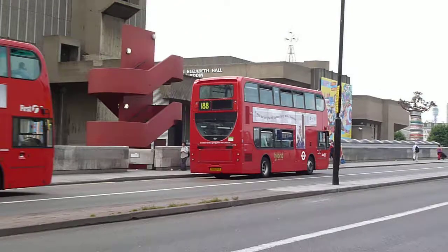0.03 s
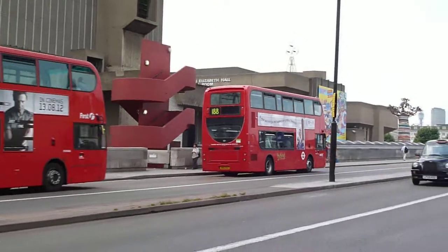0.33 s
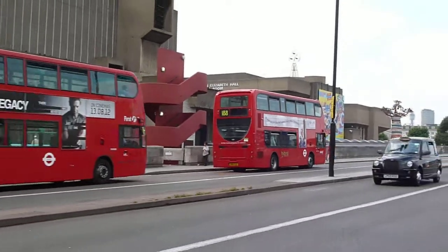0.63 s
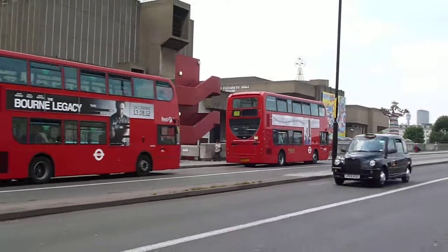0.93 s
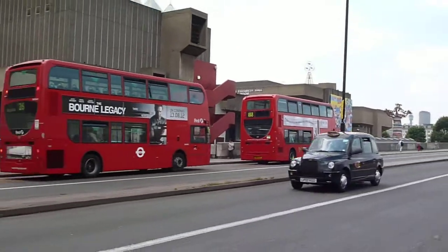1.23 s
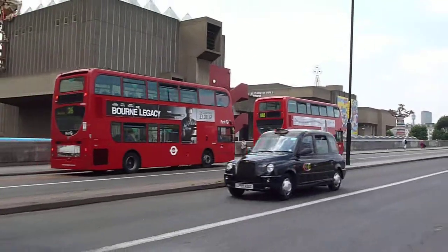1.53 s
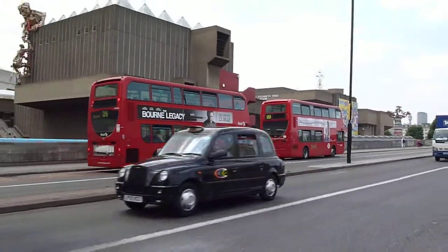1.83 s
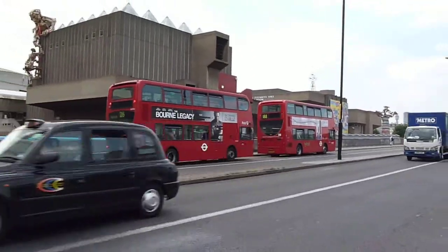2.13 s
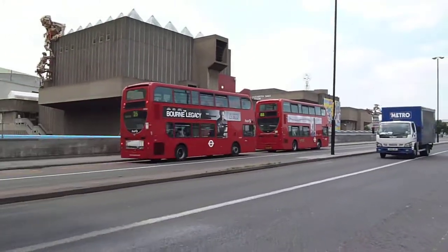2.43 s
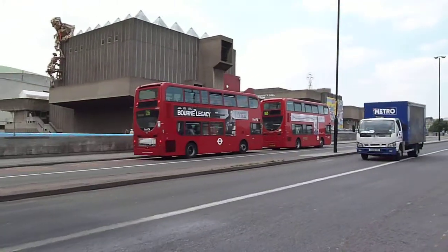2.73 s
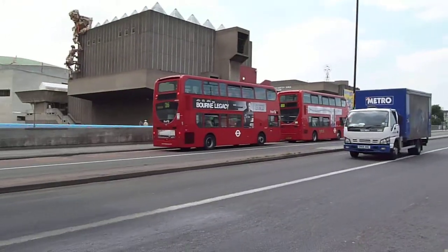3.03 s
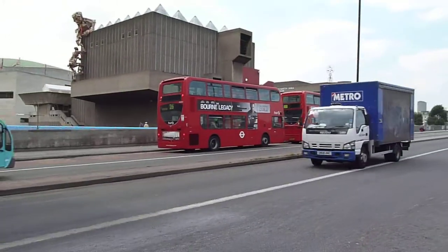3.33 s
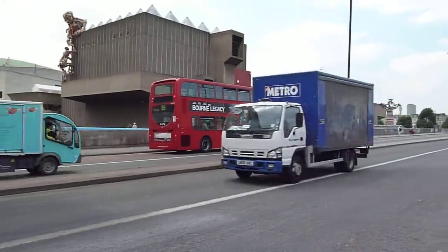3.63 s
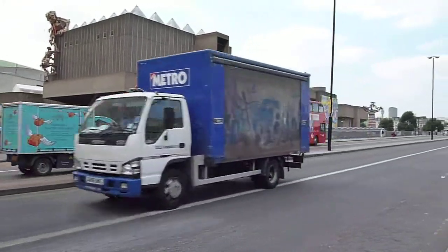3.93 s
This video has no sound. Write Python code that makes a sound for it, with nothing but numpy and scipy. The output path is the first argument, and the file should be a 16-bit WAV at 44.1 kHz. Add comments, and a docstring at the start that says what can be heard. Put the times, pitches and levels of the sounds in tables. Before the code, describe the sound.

Road traffic with a bus pulling away, then a diesel taxi and a truck passing.

```python
"""Traffic on a city bridge, heard from the kerb through a small mono microphone.
First a bus pulls away on the far side, over the steady wash of other traffic; wheels and bodywork thump.
Then a diesel taxi comes up, passes at two seconds and leaves its roar and a tailpipe boom behind.
Last comes a box truck, and loose fittings tick. Each engine pulses and hums in step with its firing;
the noise from the front of the taxi and the truck reaches the ear both directly and off the asphalt."""
import sys
import numpy as np
from scipy import signal
from scipy.fft import rfft, irfft
from scipy.io import wavfile

SR = 44100
rng = np.random.default_rng(int(sys.argv[2]) if len(sys.argv) > 2 else 0)


def inscribe(sig):
    """Save sig as 16-bit PCM at rate SR to the path in sys.argv[1].

    A 1-D sig is mono; a 2-D sig holds one channel per row.
    Samples are clipped to [-1, 1] before scaling.
    """
    pcm = np.round(np.clip(np.atleast_2d(sig).T, -1, 1) * 32767)
    wavfile.write(sys.argv[1], SR, pcm.astype(np.int16))


N = 176400

# Noise colours, or how strong each frequency is next to the others: f/Hz, level/dB
TAXI_FRONT_COLOUR = [(60, -13), (170, -6), (310, 6), (480, 1), (620, -7), (850, -0.5), (1200, -5.5),
                     (1480, 2), (1700, -7.5), (1870, -9), (2070, -5.5), (2330, -12), (2600, -18.5),
                     (2800, -10), (3050, -11.5), (3270, -20.5), (3660, -14), (3920, -30), (4300, -19.5),
                     (4600, -22.5), (4850, -26), (5500, -27), (7000, -45.5)]
TAXI_SIDE_COLOUR = [(60, -17.5), (140, -6.5), (230, 2), (340, 0.5), (480, 1.5), (620, -9.5), (800, -8),
                    (1130, -5.5), (1300, -6.5), (1450, -5), (1720, -17.5), (2000, -22), (2350, -9.5),
                    (2600, -17), (2900, -19), (3300, -23), (3650, -21.5), (5000, -30.5), (7000, -47.5)]
TAXI_REAR_COLOUR = [(60, -15), (140, -7), (220, 2), (300, 0), (380, -4.5), (480, 0.5), (620, -1.5),
                    (800, -2.5), (950, -4.5), (1100, -15), (1380, -8), (1600, -14), (1870, -13),
                    (2150, -17), (2400, -15.5), (2820, -16), (3250, -26.5), (3600, -24.5), (5000, -30),
                    (7000, -47.5)]
TRUCK_FRONT_COLOUR = [(100, 3), (200, 9.5), (270, 1), (350, 8.5), (550, -7), (920, 1), (1300, -4.5),
                      (2000, -3.5), (2650, -3), (3050, -2.5), (3550, -4), (3900, -8), (4300, -7.5),
                      (5700, -17), (7000, -32.5)]
TRUCK_TYRES_COLOUR = [(60, -8), (115, -6), (250, -9.5), (370, 2), (560, -9), (750, -0.5), (930, 2),
                      (1130, -3), (1450, -14), (1850, -9), (2200, -20.5), (2650, -16.5), (3100, -25),
                      (3480, -17.5), (3850, -34.5), (4250, -22.5), (4750, -32.5), (5200, -29), (7000, -51)]
BUS_ENGINE_COLOUR = [(40, -10.5), (75, 1), (150, -2), (230, 4.5), (290, 0.5), (380, -13.5), (480, 0),
                     (620, -5), (780, -7), (1200, 0), (1450, -7), (1800, -10), (2300, -12), (3500, -17.5),
                     (4100, -22), (7000, -48.5), (7500, -69)]
BUS_ROAR_COLOUR = [(150, -15.5), (215, -0.5), (330, -15.5), (480, -4.5), (620, -3.5), (760, -3.5),
                   (1000, -18.5), (3000, -38.5), (7000, -54)]
TICK_COLOUR = [(3000, -3), (5500, -6), (7000, -13), (9000, -12)]
WASH_COLOUR = [(20, -11.5), (32, -10.5), (45, -0.5), (70, 2), (120, -0.5), (190, 1.5), (290, 0.5),
               (470, -2.5), (620, -10), (850, -3), (1100, 0), (1350, -5), (1650, -15.5), (2300, -16.5),
               (2900, -22.5), (3500, -22), (3850, -26), (4400, -25.5), (5200, -28.5), (6300, -37.5),
               (6900, -44.5), (7400, -77)]
# How loud each part of a vehicle is as it comes and goes: t/s, level/dB
TAXI_FRONT_LEVEL = [(0, -40), (.8, -33.5), (1.15, -30.5), (1.4, -26), (1.55, -30), (1.72, -25.5),
                    (1.96, -25), (2.07, -32), (2.3, -42), (4, -73)]
TAXI_SIDE_LEVEL = [(0, -74.5), (1.9, -43), (2.07, -31.5), (2.17, -25.5), (2.29, -26), (2.42, -34.5),
                   (2.7, -41), (4, -71)]
TAXI_REAR_LEVEL = [(0, -69.5), (2.1, -40), (2.24, -31.5), (2.4, -26.5), (2.55, -26), (2.7, -27.5),
                   (2.88, -25.5), (3.05, -29), (3.2, -34.5), (3.5, -42.5), (4, -51)]
TAXI_WHINE_LEVEL = [(0, -62), (1.2, -46.5), (2, -49), (2.1, -52), (2.28, -44), (2.5, -51.5), (4, -76)]
TAXI_EXHAUST_LEVEL = [(0, -50.5), (1, -42), (1.3, -31.5), (1.7, -52), (2.05, -43), (2.4, -41.5), (4, -46.5)]
TRUCK_FRONT_LEVEL = [(0, -69.5), (2.5, -51), (3.2, -41.5), (3.62, -40), (3.74, -34.5), (3.83, -34),
                     (3.92, -31.5), (4, -30.5)]
TRUCK_TYRES_LEVEL = [(0, -67.5), (2, -35.5), (2.7, -31), (3.05, -28.5), (3.4, -31), (3.7, -31.5),
                     (3.95, -26.5), (4, -28)]
TRUCK_EXHAUST_LEVEL = [(0, -65), (2.2, -39), (3, -38.5), (3.55, -33), (3.8, -39.5), (4, -38)]
BUS_ENGINE_LEVEL = [(0, -35), (.27, -31), (.5, -33), (.6, -29.5), (.73, -30), (.8, -35.5), (.95, -31),
                    (1.2, -29), (1.6, -31), (2.2, -40), (4, -43)]
BUS_ROAR_LEVEL = [(0, -34.5), (.35, -34.5), (.65, -38), (.85, -52.5), (4, -67.5)]
BUS_EXHAUST_LEVEL = [(0, -36), (.6, -38.5), (.9, -36.5), (1.3, -45.5), (2, -46.5), (4, -48)]
# The taxi's tailpipe booms once it points this way: t/s, level/dB
TAXI_BOOM_LEVEL = [(0, -80), (2.1, -45), (2.42, -28), (2.58, -37.5), (2.73, -24.5), (2.87, -41),
                   (3.25, -35.5), (4, -47.5)]
# How often each engine fires: t/s, f/Hz
TAXI_FIRING = [(0, 57), (1.27, 55.46), (1.5, 53.03), (2.05, 45.93), (2.5, 46.08), (2.75, 45.8), (4, 44.37)]
TRUCK_FIRING = [(0, 44.1), (2.4, 44.5), (2.9, 46.17), (3.5, 47.8), (4, 48.5)]
BUS_FIRING = [(0, 48.2), (.3, 46), (.7, 45.2), (1.1, 44.2), (1.6, 43.72), (4, 41.7)]
# The tones that make up each exhaust's hum: multiple of the firing rate, relative level/dB
TAXI_TONES = [(2, -7.5), (3, -0.5), (4, -11.5)]
TRUCK_TONES = [(1, -3), (2, -12.5), (3, -11.5), (4, -16)]
BUS_TONES = [(1, -7.5), (1.5, -5.5), (3, 2), (6, -7.5)]
# The noise from the taxi's front sinks in pitch as it goes by: t/s, pitch ratio
TAXI_PITCH = [(0, 1.005), (1.9, 1.0), (2.4, .94)]
# Dull thumps of wheels and bodywork: t/s, level/dB, f/Hz
THUMPS = [(.305, -18, 105), (.468, -17, 221), (.678, -19, 200), (0.729, -17, 75), (.885, -21.5, 175),
          (1.467, -13, 136), (2.015, -17, 91), (2.051, -17, 92), (3.755, -18.5, 127)]
# Small ticks from loose fittings: t/s, level/dB
TICKS = [(3.452, -53), (3.727, -44), (3.848, -50)]


def taxi():
    """Bright engine and tyre noise from the front, then the side with a thin whine, then a dark roar."""
    phase = firing_phase(TAXI_FIRING)
    front = doppler(clatter(phase, TAXI_FRONT_COLOUR, depth=0.14), TAXI_PITCH)
    front = fade(TAXI_FRONT_LEVEL) * road_echo(front, delay_s=0.00089, share=0.36)
    side = fade(TAXI_SIDE_LEVEL) * rms_one(clatter(phase, TAXI_SIDE_COLOUR, depth=0.1))
    rear = fade(TAXI_REAR_LEVEL) * rms_one(clatter(phase, TAXI_REAR_COLOUR, depth=0.062))
    whine_hz = 2298
    whine = fade(TAXI_WHINE_LEVEL) * rough_tone(2 * np.pi * whine_hz * np.arange(N) / SR, width_hz=16)
    return front + side + rear + whine + taxi_tailpipe(phase)


def taxi_tailpipe(phase):
    """The taxi's exhaust hums, and booms with a fluttering tone at six times the firing rate."""
    boom = rms_one(1.3 * np.sin(6 * phase) + rough_tone(6 * phase, width_hz=14))
    return fade(TAXI_EXHAUST_LEVEL) * exhaust(phase, TAXI_TONES) + fade(TAXI_BOOM_LEVEL) * boom


def truck():
    """Tyre rush and a deep hum arrive first, the diesel's clatter when it is close."""
    phase = firing_phase(TRUCK_FIRING)
    front = road_echo(clatter(phase, TRUCK_FRONT_COLOUR, depth=0.13), delay_s=0.00138, share=0.17)
    tyres = fade(TRUCK_TYRES_LEVEL) * noise(TRUCK_TYRES_COLOUR)
    hum = fade(TRUCK_EXHAUST_LEVEL) * exhaust(phase, TRUCK_TONES)
    return fade(TRUCK_FRONT_LEVEL) * front + tyres + hum


def bus():
    """The bus draws away, its drone sinking; a hollow roar is heard while its side is still near."""
    phase = firing_phase(BUS_FIRING)
    engine = fade(BUS_ENGINE_LEVEL) * rms_one(clatter(phase, BUS_ENGINE_COLOUR, depth=0.18))
    roar = fade(BUS_ROAR_LEVEL) * noise(BUS_ROAR_COLOUR)
    return engine + roar + fade(BUS_EXHAUST_LEVEL) * exhaust(phase, BUS_TONES)


def firing_phase(firing):
    """An angle that makes one full turn each time the engine fires, at a slightly unsteady speed."""
    rate_hz = in_time(firing) * (1 + 0.0063 * drift(rate_hz=6.7))
    return 2 * np.pi * np.cumsum(rate_hz) / SR


def clatter(phase, colour, depth):
    """Engine noise that swells at every firing; depth sets how much."""
    return noise(colour) * np.exp(depth * (np.cos(phase) + .5 * np.sin(2 * phase)))


def exhaust(phase, tones):
    """An exhaust's hum: tones at multiples of the firing rate, each wavering in loudness by itself."""
    hum = np.zeros(N)
    for multiple, db in tones:
        strength = np.sqrt(2) * from_db(db + 1.5 * drift(rate_hz=2.5))
        hum += strength * np.sin(multiple * phase + rng.uniform(0, 2 * np.pi))
    return hum


def doppler(sound, pitch):
    """The pitch shift of a passing vehicle, made by playing its sound faster or slower."""
    return np.interp(np.cumsum(in_time(pitch)), np.arange(N), sound, period=N)


def road_echo(sound, delay_s, share):
    """The direct sound plus a later, weaker copy that bounces off the asphalt; strength 1."""
    n = np.arange(N)
    return rms_one(sound + share * np.interp(n - delay_s * SR, n, sound))


def thumps():
    """Each thump of a wheel or body panel is one low ring that dies quickly."""
    out = np.zeros(N)
    for start, db, hz in THUMPS:
        age = np.clip(np.arange(N) / SR - start, 0, 1)
        out -= from_db(db) * die_away(age, ring_s=0.054) * np.sin(2 * np.pi * hz * age)
    return out


def ticks():
    """Loose fittings tick: short bright bursts of noise with a high metallic ring."""
    t = np.arange(N) / SR
    ring_hz = 7230
    metal = noise(TICK_COLOUR) + .2 * np.sin(2 * np.pi * ring_hz * t)
    return metal * sum(from_db(db) * die_away(t - start, ring_s=.06) for start, db in TICKS)


def far_traffic():
    """The even wash of all the other vehicles, blocked for a moment by the taxi's body."""
    wash_db, dip_db, dip_at_s, dip_width_s = -28, -5, 2.078, 0.019
    dip = np.exp(-((np.arange(N) / SR - dip_at_s) / dip_width_s) ** 2)
    return from_db(wash_db + dip_db * dip) * noise(WASH_COLOUR)


def noise(colour):
    """Noise of the given colour, falling away below its lowest listed frequency; strength 1."""
    hz, db = np.transpose(colour)
    f = np.maximum(np.arange(N // 2 + 1) * SR / N, 1)
    gain = from_db(np.interp(np.log(f), np.log(hz), db))
    gain *= np.minimum(f / hz[0], 1) ** 2
    return rms_one(irfft(rfft(rng.standard_normal(N)) * gain, N))


def rough_tone(phase, width_hz):
    """A narrow band of noise around one pitch, heard as a fluttering tone."""
    return drift(width_hz) * np.cos(phase) + drift(width_hz) * np.sin(phase)


def drift(rate_hz):
    """A slow random wander around zero, typically of size 1."""
    step, warm_up = 40, 2000  # one value every 40 samples; the first 2000 values are skipped
    keep = np.exp(-2 * np.pi * step * rate_hz / SR)
    jitter = rng.standard_normal(N // step + warm_up + 2)
    slow = signal.lfilter([1], [1, -2 * keep, keep * keep], jitter)[warm_up:]
    return np.interp(np.arange(N) / step, np.arange(len(slow)), rms_one(slow))


def die_away(age, ring_s):
    """Silent before age zero, then a jump to 1 that falls by 60 dB in ring_s seconds."""
    return (age >= 0) * np.exp(-np.log(1000) * np.clip(age, 0, 1) / ring_s)


def fade(levels):
    """Turn a table of times and decibels into a volume for every sample."""
    return from_db(in_time(levels))


def in_time(rows):
    """Join a table's points with straight lines, giving a value for every sample."""
    times, values = np.transpose(rows)
    return np.interp(np.arange(N) / SR, times, values)


def from_db(db):
    """Turn decibels into a number to multiply by."""
    return 10 ** (np.asarray(db) / 20)


def rms_one(x):
    """Scale a signal so that its average strength (root mean square) is 1."""
    return x / np.sqrt(np.mean(x ** 2) + 1e-20)


def scene():
    """Everything on the bridge, in one channel."""
    return (far_traffic() + bus() + taxi() + truck() + thumps() + ticks())[None]


def record(dry):
    """The recorder drops the deepest rumble and cuts the highest treble steeply."""
    low_cut_hz, high_cut_hz = 20, 7300
    thinned = signal.sosfilt(signal.butter(2, low_cut_hz, "high", fs=SR, output="sos"), dry)
    return signal.sosfilt(signal.ellip(10, .2, 85, high_cut_hz, fs=SR, output="sos"), thinned)


dry = scene()
out = record(dry)
inscribe(out)
```